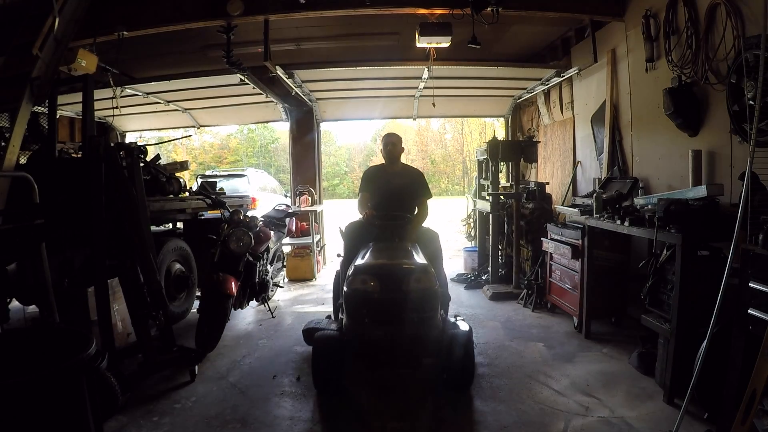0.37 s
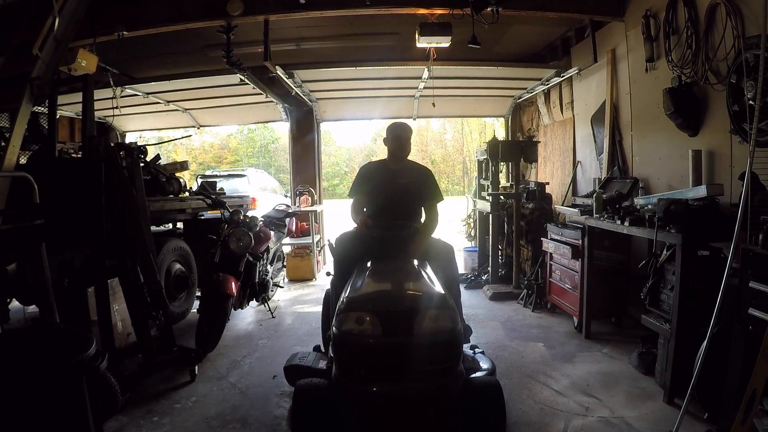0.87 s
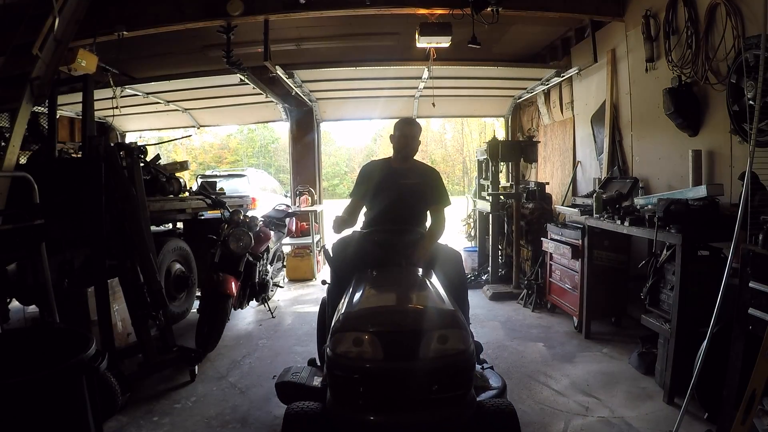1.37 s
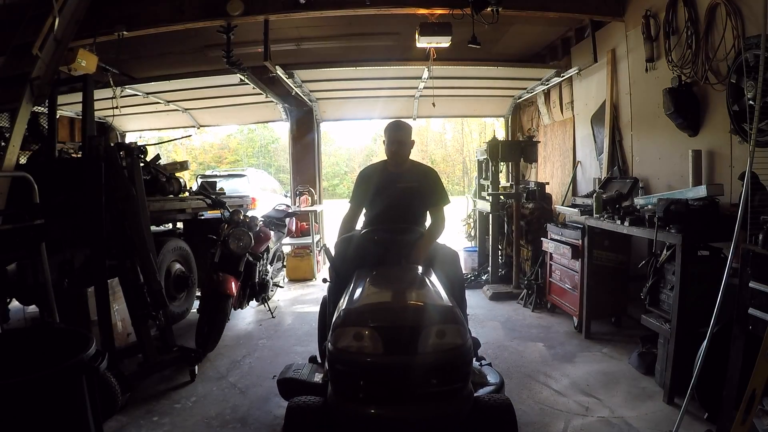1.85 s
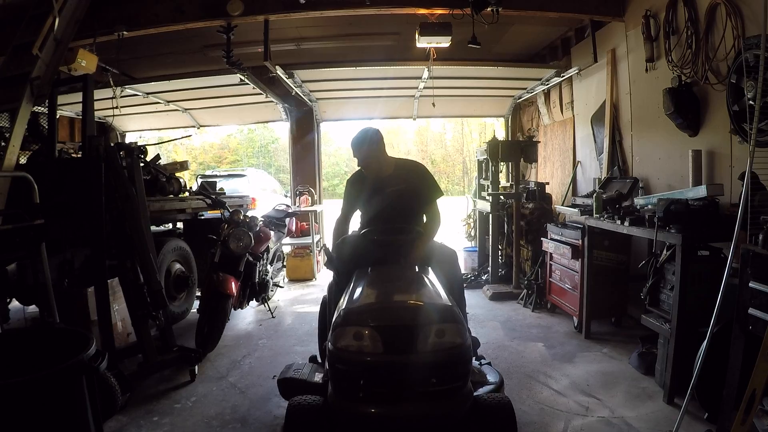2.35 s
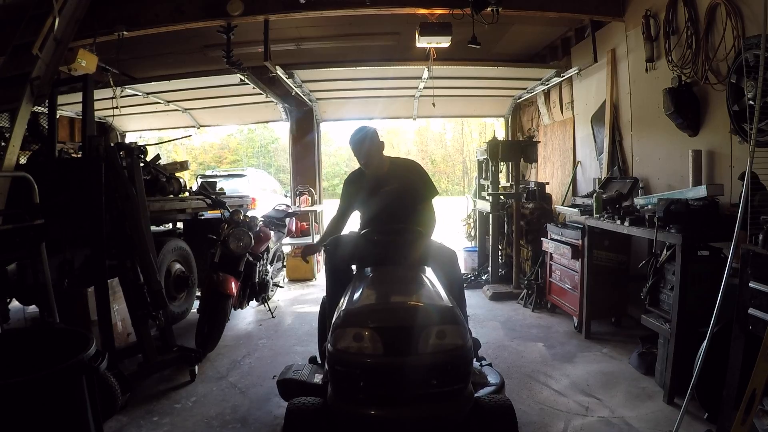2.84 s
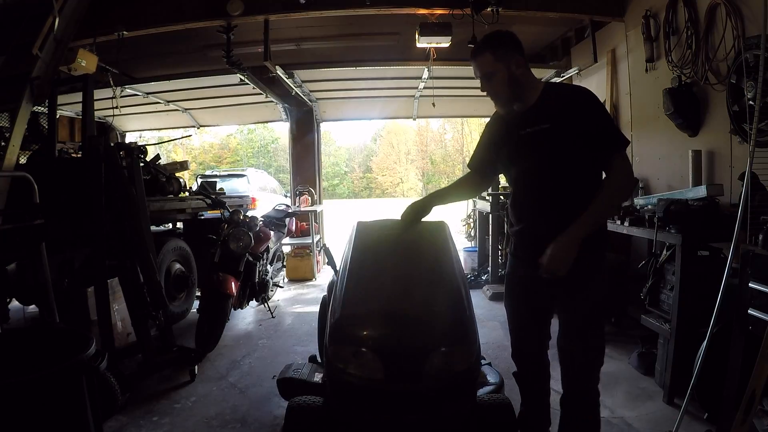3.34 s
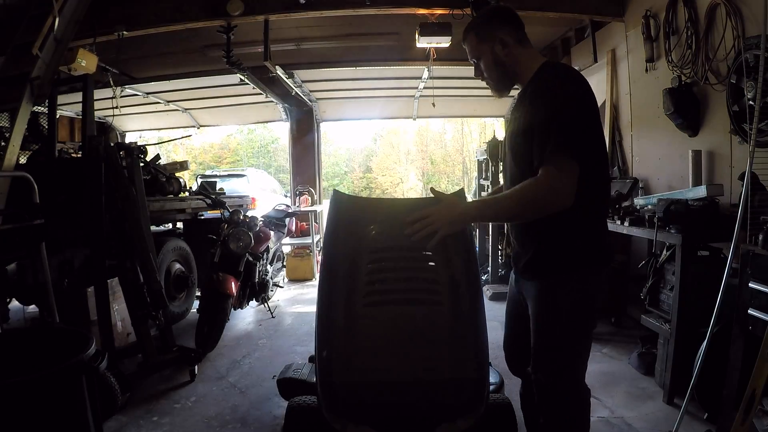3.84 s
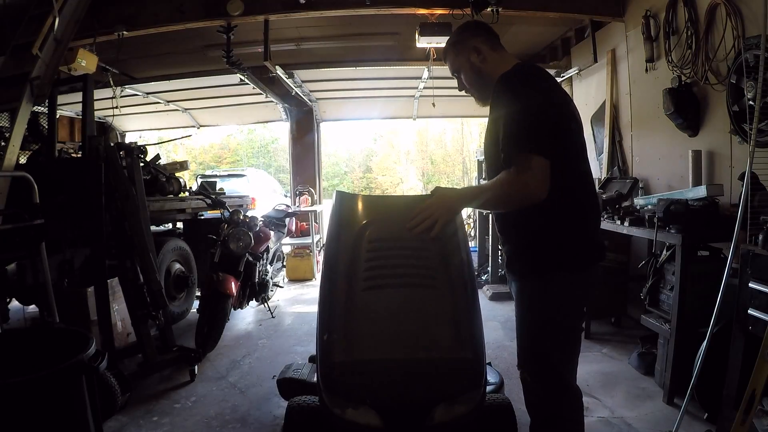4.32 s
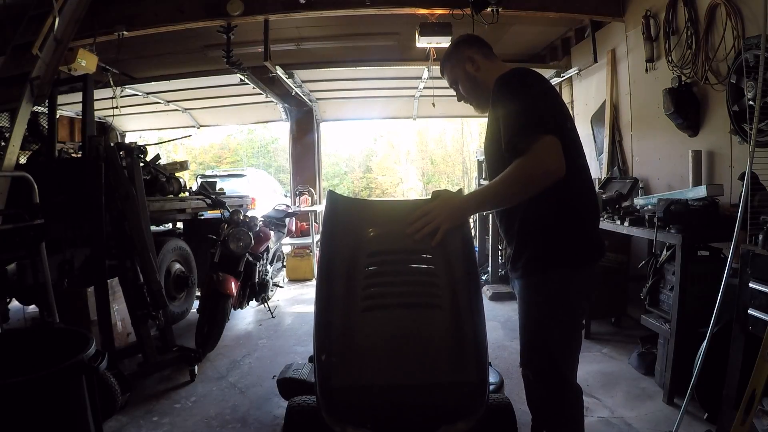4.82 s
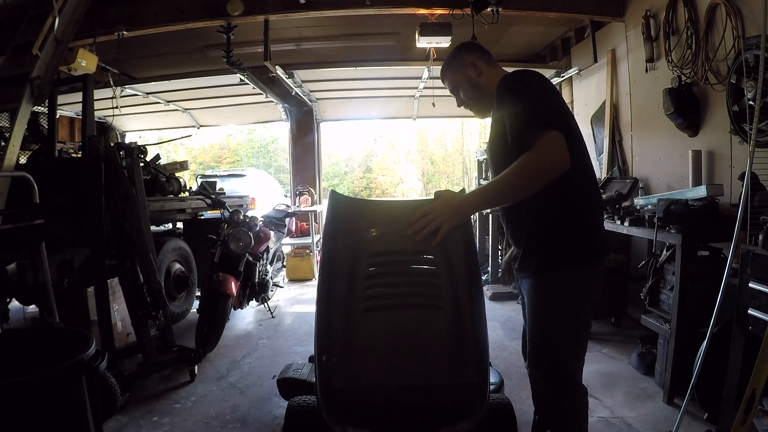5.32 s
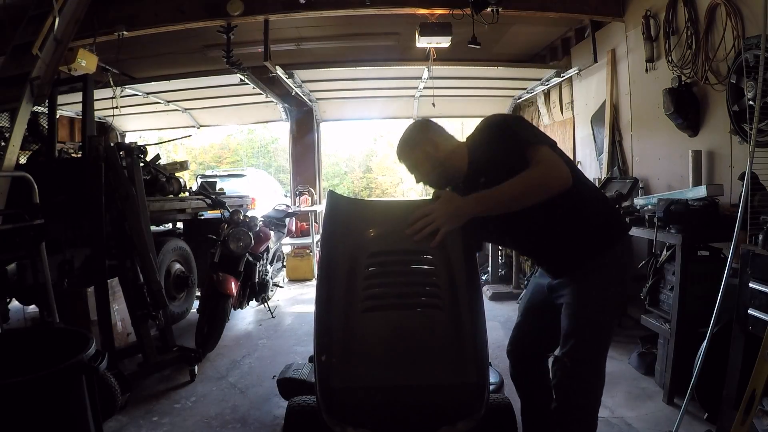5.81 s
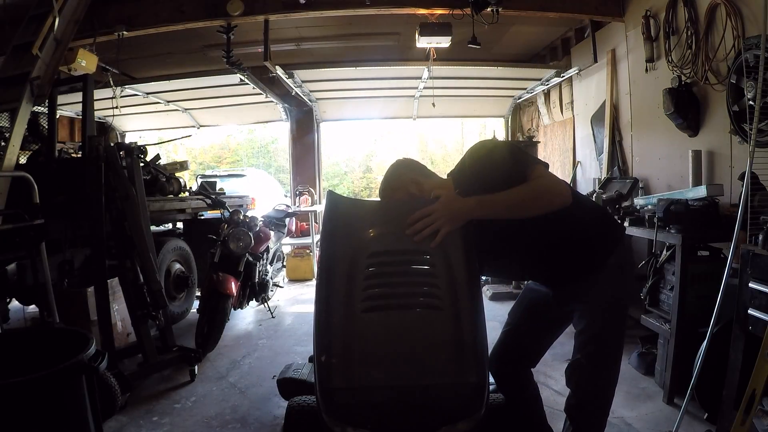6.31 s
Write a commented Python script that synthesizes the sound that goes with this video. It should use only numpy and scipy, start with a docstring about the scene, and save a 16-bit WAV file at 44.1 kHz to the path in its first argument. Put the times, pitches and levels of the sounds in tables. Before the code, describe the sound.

From 0 to about 3 s a small single-cylinder tractor engine dominates. It rolls into a reverberant garage with a brief throttle blip at the start, roughly 25 to 27 firings a second, and halts before the microphone near 0.6 s. Light linkage ticks fall at 0.16 and 0.53 s. The boomy, tinny, clattering throb, with pulsing intake hiss, sags to about 16 firings a second, then breaks off abruptly at 2.99 s. Quiet low rumble and air hiss remain. Shoes scuff and feet shuffle from 3 to 4.5 s. A small hood click and a faint, thin squeak come near 3.3 s, the strongest metal knock at 3.5, another at 3.6, then lower, hollow knocks at 3.93 and 4.02, with deep thumps beneath. Faint taps and scuffs lead to a rounder thud at 4.94 s. Soft cloth rustles follow, a scuff at 5.6, and a firm closing knock at 6.4 s.

```python
"""The throb of a single-cylinder lawn tractor is heard first; it rolls into a garage, stops and idles ever slower.
The engine sound breaks off abruptly; then the sheet-metal hood is lifted with knocks, a hinge squeak and a
rounder thud of something else while shoes and clothes scuff. Periodic firing drives resonant modes of air and
tinware; knocks and scuffs are decaying noise bursts with reverberant tails; the squeak is a gliding sine.
Low rumble and air hiss stay beneath, at one microphone."""
import sys
import numpy as np
from scipy import signal
from scipy.fft import rfft, irfft, next_fast_len
from scipy.io import wavfile
from scipy.ndimage import uniform_filter1d, map_coordinates

SR = 44100
rng = np.random.default_rng(int(sys.argv[2]) if len(sys.argv) > 2 else 0)


def nominal_scale(level):
    """Amplitude ratio for a level in decibels (scalar or array-like)."""
    x = np.asarray(level, float) / 20
    return 10 ** x


def int16_out(signal):
    """Quantize to a 16-bit WAV file."""
    q = np.round(np.clip(np.atleast_2d(signal).T, -1, 1) * 32767)
    wavfile.write(sys.argv[1], SR, q.astype(np.int16))


N = 283563
T = np.arange(N) / SR  # time [s]

# Firing rate, a last blip of throttle, then a long sag towards idle: (time [s], rate [firings/s])
FIRING_RATE = [(0.0, 25.6), (0.12, 27.55), (0.32, 24.15), (0.65, 21.97), (1.05, 20.45), (1.55, 18.6),
               (1.8, 18.0), (2.1, 17.4), (2.98, 16.25)]
# Garage air modes excited by the exhaust, from the doorway and from the parking spot:
# (frequency [Hz], width [Hz], relative level [dB], signed weight [-])
DOORWAY_MODES = [(26, 8.4, -6, 1), (46.2, 15, -2, -1.05), (81.3, 4, 5, 0.92), (120.3, 7.6, 2, 0.81),
                 (138.6, 8.9, -1.5, 0.5), (186, 17, -6, -0.98), (236.7, 4.1, -1, 0.98),
                 (267, 25, -8.5, 0.97), (316, 9.4, -15, 1)]
PARKED_MODES = [(20.2, 7.9, -32, -1), (39, 8.6, -7, 0.97), (82.4, 7.5, -1.5, 1), (110.46, 4.1, 1, -0.95),
                (119.7, 3.3, -9, -0.67), (144.2, 18.5, 7.5, 0.114), (166.5, 11.4, -4, -1.02),
                (197.65, 8, -5.5, -1.1), (222.8, 3, -19, -1.5), (246.4, 10, -28.5, -1.2),
                (270.2, 10.6, -14, -0.9), (285.4, 15, -23, 0.93), (326.2, 6.4, -21.5, 0.65),
                (335, 3.4, -15, 0.97)]
# Resonances of the engine tinware: (frequency [Hz], width [Hz], relative level [dB], signed weight [-])
TINWARE_MODES = [(458, 45, -7, 0.9), (520, 37, -4.5, -0.78), (636, 59, -0.5, 0.85), (651, 33, 3.5, -0.46),
                 (726, 8, -9, 0.7), (836, 14, -1.5, -1.05), (1226, 5.9, 1.5, 1), (1433, 70, -2, -0.56),
                 (2150, 69, 6, 1)]
# Spectra of the tinware clatter and the intake hiss: (frequency [Hz], relative density [dB per Hz])
CLATTER_SPECTRUM = [(230, -4), (385, -9), (450, -3.5), (646, -3), (1070, -5.5), (1230, -6), (1920, -10),
                    (2100, -13), (2420, -13), (4810, -18), (8500, -30.5), (11000, -40.5), (18700, -120)]
HISS_SPECTRUM = [(3820, -6.5), (6500, -2), (7650, -6), (8450, -8), (12200, -4), (14400, -9), (15200, -15)]
# Knocks on the hood and, at 4.944 s, a rounder thud of something else:
# (time [s], peak short-term level [dB], centre [Hz], edge level [dB], rattle t60 [s])
KNOCK_EVENTS = [(3.265, -39, 1350, -18.5, 0.054), (3.276, -38, 1410, -27, 0.12),
                (3.43, -53.5, 910, -6, 0.3), (3.504, -24.5, 1210, -5.5, 0.2),
                (3.588, -31.5, 1150, -11, 0.47), (3.934, -29.5, 520, -16, 0.41),
                (4.017, -34.5, 500, -7.5, 0.27), (4.24, -50, 695, -23, 0.54), (4.68, -49.5, 620, -29, 0.45),
                (4.897, -52, 510, -30, 0.12), (4.944, -38, 950, -26.5, 0.27), (6.395, -40.5, 875, -6, 0.68),
                (6.4176, -26, 1120, -9, 0.28)]
# Resonances of the hood panel: (frequency [Hz], width [Hz], relative level [dB], signed weight [-])
HOOD_MODES = [(164.3, 5.6, 2, -1.33), (220, 4.2, -1, 1), (249.7, 6.9, 5, -1.13), (280, 35, -1, 0.61),
              (427.3, 4.6, 0.5, -1.18), (468.5, 32, -6, 0.67), (566.4, 10, 1.5, -1.12), (636, 13, -6, 0.87),
              (721, 21, 0, -1.1), (864, 70, 1, 0.17), (1031, 31, -2, -0.94), (1150, 58, -11, 0.44),
              (1256, 60, -2, -1.05), (1525, 46, -5.5, 0.47), (2203, 46, -0.5, -1.08), (2580, 51, -6, 0.42),
              (3030, 63, -2, -0.88), (3550, 37, -4, 0.48), (4280, 56, -4, -1.25)]
# Shoes and hands catching on floor and metal:
# (time [s], peak short-term level [dB], centre [Hz], treble setting [dB], t60 [s])
SCUFF_EVENTS = [(3.05, -47.5, 3680, -18.5, 0.48), (3.7873, -48, 4340, -8.5, 1),
                (3.905, -45.5, 4370, -13, 0.43), (4.0161, -36.5, 3420, -7, 0.26),
                (4.655, -51, 2470, -27, 0.4), (4.7152, -50.5, 5600, -8, 0.23),
                (5.602, -48.5, 3030, -14, 0.31), (6.3336, -42.5, 4140, -11, 0.34)]
# Pedal linkage ticks: (time [s], peak short-term level [dB])
LINKAGE_TICKS = [(.159, -37), (.532, -35)]
# Cloth and engine hiss swelling briefly:
# (time [s], length [s], peak short-term level [dB], treble level [dB])
RUSTLE_EVENTS = [(2.452, 0.095, -39.5, -13), (4.201, 0.13, -58, -4), (4.386, 0.12, -65, -1),
                 (5.302, 0.29, -59.5, -8), (5.748, 0.094, -56, -11), (6.229, 0.14, -59, -15)]
# Spectrum of the rustles below their treble: (frequency [Hz], relative level [dB])
CLOTH_SPECTRUM = [(300, -12), (1500, 3.5), (3000, 4), (4300, 2), (5600, 0.5), (7300, -6.5), (8200, -11)]
# Deep thumps, the chassis rocking as the hood swings and lands: (time [s], level before rise and decay [dB])
CHASSIS_THUMPS = [(3.27, -52), (3.51, -37), (3.935, -37.5), (4.7, -59)]
# Spectra of low rumble, shuffling feet and air hiss: (frequency [Hz], relative density [dB per Hz])
RUMBLE_SPECTRUM = [(12, -39), (20, -4), (37, -1.5), (49, -9), (81, -8), (92, -17.5), (113, -4), (123, -26),
                   (135, -26), (260, -42), (340, -69), (570, -120)]
SHUFFLE_SPECTRUM = [(90, -17), (140, -2.5), (200, 0.5), (330, -8.5), (500, -5), (900, -37)]
AIR_SPECTRUM = [(120, -40), (200, -9.5), (420, -14), (452, -6), (495, -23), (562, -5), (661, -11),
                (2670, -16), (3630, -15), (15200, -32)]
# Reverberation of the garage: (frequency [Hz], t60 [s])
GARAGE_T60 = [(100, 0.75), (500, 0.53), (2000, 0.35), (6000, 0.47), (14000, 0.23)]

ARRIVE = (0.546, 0.61)  # the tractor halts in front of the microphone [s]
CUT = (2.984, 2.997)  # the engine sound breaks off abruptly [s]
IDLE = 17  # firings per s at which the clatter and hiss levels hold
EXHAUST_DB = -28.5
CLATTER_DB, CLATTER_GROWS = -35, 0.41  # at idle [dB]; [dB] per extra firing a second
HISS_DB, HISS_GROWS = -52, 0.079  # at idle once parked [dB]; [dB] per extra firing a second
ROLLING_HISS_DB = 3.5  # more hiss while the tractor rolls
BOOM_FALLS_DB = 4.5  # boom lost per octave of knock centre above 500 Hz
PROPPED_S, PROPPED_BOOM_DB = 4.92, -19.5  # once the hood stands propped, knocks and thud boom less
LINKAGE_COLOUR = (3400, -15.5, 0.16)  # centre [Hz], treble setting [dB], t60 [s]
SCUFF_LOW_DB, TICK_LOW_DB = -6, -13  # settings for the low end under the centre
BURST_S = 0.8  # length of every burst
SQUEAK_S, SQUEAK_HZ, SQUEAK_RISE_HZ = (3.28, 3.39), 2300, 19.3
SQUEAK_DB, SQUEAK_FADE_DB = -49, -6.5  # rms at the start; change by the end
THUMP_RISE_S, THUMP_T60_S = 0.025, 0.82
RUMBLE_DB, AIR_DB = -56.5, -62  # low rumble from outdoors; air hiss
SHUFFLE_DB, STILL_DB = -55, -68.5  # feet shuffling while the hood is lifted; before and after
SHUFFLE_STARTS, SHUFFLE_ENDS = (3, 3.05), (4.04, 4.6)  # [s]


def unit(x):
    """Normalization: the signal scaled to rms 1."""
    return x / np.sqrt(np.mean(x ** 2) + 1e-20)


def along(points, hz):
    """Logarithmic frequency scale: (Hz, value) points interpolated on a log axis."""
    f, v = np.transpose(points)
    return np.interp(np.log(hz + 1), np.log(f + 1), v)


def ramp(span):
    """Linear transition: 0 before the span, 1 after it."""
    return np.interp(T, span, [0, 1])


def wobble(rate):
    """Band-limited fluctuation: a smooth random curve with rate knots a second."""
    knots = rng.standard_normal(int(N * rate / SR) + 4)
    return map_coordinates(knots, [T * rate])


def filtered(x, response):
    """Linear filtering: the spectrum of x times a complex response of frequency."""
    m = next_fast_len(len(x) + SR // 2)
    return irfft(rfft(x, m) * response(np.fft.rfftfreq(m, 1 / SR)), m)[:len(x)]


def modes(table):
    """Modal superposition: damped resonances add; neighbours of like polarity cancel in between."""
    def response(f):
        return sum(weight * nominal_scale(db) * 1j * f * width / (centre * centre - f * f + 1j * f * width)
                   for centre, width, db, weight in table)
    return response


def noise(spectrum):
    """Spectral shaping: white noise coloured and scaled to rms 1."""
    return unit(filtered(rng.standard_normal(N), lambda hz: nominal_scale(along(spectrum, hz))))


def garage(x, wet_db):
    """Reverberation: a fresh diffuse noise tail in which each frequency dies at its own speed."""
    hz, t, z = signal.stft(rng.standard_normal(SR // 2), SR, nperseg=256)
    decay = nominal_scale(-60 * t / np.abs(along(GARAGE_T60, hz))[:, None])
    tail = signal.istft(z * decay, SR, nperseg=256)[1]
    tail = tail / np.linalg.norm(tail)
    delayed = np.pad(x, (200, 0))  # the tail begins 200 samples late
    return x + nominal_scale(wet_db) * signal.fftconvolve(delayed, tail)[:len(x)]


def burst(out, s, db, colour, envelope, wet_db):
    """Transient excitation: enveloped noise is coloured, reverberates and is added at time s."""
    dry = filtered(envelope * rng.standard_normal(len(envelope)), colour)
    wet = garage(dry, wet_db)
    peak_rms = np.sqrt(uniform_filter1d(wet ** 2, size=2000).max())  # loudest 2000-sample stretch
    piece = nominal_scale(db) * wet / peak_rms
    return out + np.pad(piece, (round(s * SR), N))[:N]


def engine():
    """Periodic excitation: firings ring garage modes and clattering tinware; the intake gasps once a cycle."""
    speed = np.interp(T, *np.transpose(FIRING_RATE))
    parked = ramp(ARRIVE)
    cycle = np.cumsum(speed) / SR + 0.0027 * wobble(12)  # firings so far, slightly unsteady

    turbulence = 0.8 * rng.standard_normal(N)
    puffs = orders(cycle, first=1, count=22, smear=0.022) * nominal_scale(0.3 * wobble(18)) + turbulence
    doorway_exhaust = unit(filtered(puffs, modes(DOORWAY_MODES)))
    parked_exhaust = unit(filtered(puffs, modes(PARKED_MODES)))
    exhaust = (1 - parked) * doorway_exhaust + parked * parked_exhaust

    ringing = orders(cycle, first=20, count=56, smear=0.013) * nominal_scale(1.4 * wobble(8.95))
    buzz = unit(filtered(ringing, modes(TINWARE_MODES)))
    # four strokes a cycle: a gliding whine
    strokes = filtered(orders(4 * cycle, first=6, count=5, smear=0.13), modes([(640, 91, 0, 1)]))
    whine = unit(strokes) * nominal_scale(2.1 * wobble(5.45))
    tins = unit(filtered(noise(CLATTER_SPECTRUM), lambda hz: 1 + 0.57 * np.abs(modes(TINWARE_MODES)(hz))))
    pulsing_tins = tins * nominal_scale(0.66 * np.cos(2 * np.pi * (cycle - 0.25)))
    clatter = unit(pulsing_tins + nominal_scale(-11.5) * buzz + nominal_scale(-8) * whine)
    clatter_db = CLATTER_DB + CLATTER_GROWS * (speed - IDLE)

    depth_db = np.interp(speed, [17, 26], [3.4, 1.2])  # the slower, the deeper the gaps between gasps
    gasp_db = depth_db * np.tanh(1.5 * np.cos(2 * np.pi * (cycle - 0.7)))
    hiss = unit(nominal_scale(gasp_db + 0.8 * wobble(12)) * noise(HISS_SPECTRUM))
    hiss_db = HISS_DB + HISS_GROWS * (speed - IDLE) + ROLLING_HISS_DB * (1 - parked)

    sound = nominal_scale(EXHAUST_DB) * exhaust + nominal_scale(clatter_db) * clatter + nominal_scale(hiss_db) * hiss
    return sound * (1 - ramp(CUT))


def orders(cycle, first, count, smear):
    """Harmonic dispersion: the muffler smears each puff over the cycle, higher firing orders coming later."""
    order = np.arange(count)[:, None] + first
    return unit(np.cos(2 * np.pi * (order * cycle - smear * order ** 2)).sum(axis=0))


def knocks():
    """Impact excitation: each knock or thud cracks, rattles unevenly and rings most the modes near its centre."""
    out, t = np.zeros(N), T[:int(BURST_S * SR)]
    panel = modes(HOOD_MODES)  # the thud is coloured by the same modes
    for s, db, centre_hz, edge_db, t60 in KNOCK_EVENTS:
        boom_db = -BOOM_FALLS_DB * np.log2(centre_hz / 500) + PROPPED_BOOM_DB * (s > PROPPED_S)
        tilt = [(60, boom_db - 6.5), (250, boom_db), (0.57 * centre_hz, -2.5), (centre_hz, 0),
                (1.51 * centre_hz, 0.38 * edge_db), (3200, edge_db), (9000, edge_db - 25),
                (15000, edge_db - 36)]
        rattle = nominal_scale(-60 * t / t60 + 6.0 * wobble(94)[:len(t)])
        crack = 0.81 * nominal_scale(-60 * t / 0.017)
        out = burst(out, s, db, lambda hz: nominal_scale(along(tilt, hz)) * (0.39 + panel(hz)),
                    rattle + crack, wet_db=-1.0)
    return out


def scuffs():
    """Frictional excitation: a sudden catch, brightest around its centre, dies away; linkage ticks likewise."""
    out, t = np.zeros(N), T[:int(BURST_S * SR)]
    grit = modes([(5600, 1200, 2.7, 0.48)])  # fine grit under the sole hisses high
    ticks = [(*row, *LINKAGE_COLOUR, TICK_LOW_DB) for row in LINKAGE_TICKS]
    catches = ticks + [(*row, SCUFF_LOW_DB) for row in SCUFF_EVENTS]
    for s, db, centre_hz, top_db, t60, low_db in catches:
        tilt = [(120, low_db - 6.5), (700, low_db + 3), (0.61 * centre_hz, -5), (centre_hz, 0),
                (1.17 * centre_hz, -4), (8500, top_db - 5.5), (12000, top_db - 3.0), (15000, top_db - 12)]
        onset = 1 - np.exp(-t / 0.00087)
        slide = onset * nominal_scale(-60 * t / t60 + 1.4 * wobble(122)[:len(t)])
        out = burst(out, s, db, lambda hz: nominal_scale(along(tilt, hz)) * (1 + grit(hz)), slide, wet_db=-7.0)
    return out


def rustles():
    """Amplitude modulation: soft, grainy hiss swells and fades over half a sine."""
    out, t = np.zeros(N), T[:int(BURST_S * SR)]
    for s, length, db, top_db in RUSTLE_EVENTS:
        tilt = CLOTH_SPECTRUM + [(12000, top_db), (15000, top_db - 6)]
        grain = nominal_scale(3.3 * wobble(50)[:len(t)])
        swell = np.sin(np.pi * np.clip(t / length, 0, 1)) * grain
        out = burst(out, s, db, lambda hz: nominal_scale(along(tilt, hz)), swell, wet_db=-1.5)
    return out


def hinge():
    """Frequency modulation: the hinge's thin squeak is a sine that rises a little as it fades."""
    way, (start, end) = ramp(SQUEAK_S), SQUEAK_S
    on = ramp((start, start + 0.01)) * (1 - ramp((end - 0.015, end)))
    phase = 2 * np.pi * np.cumsum(SQUEAK_HZ + SQUEAK_RISE_HZ * way) / SR
    level = nominal_scale(SQUEAK_DB + SQUEAK_FADE_DB * way + 1.4 * wobble(60))
    return np.sqrt(2) * on * level * np.sin(phase)


def background():
    """Incoherent addition: independent noises for rumble with chassis thumps, shuffling and steady air hiss."""
    thumps = np.zeros(N)
    for s, db in CHASSIS_THUMPS:
        t = np.clip(T - s, 0, None)
        thumps += nominal_scale(db - 60 * t / THUMP_T60_S) * (1 - np.exp(-t / THUMP_RISE_S))
    low = (nominal_scale(RUMBLE_DB + 1.9 * wobble(3.92)) + thumps) * noise(RUMBLE_SPECTRUM)
    shuffling = ramp(SHUFFLE_STARTS) * (1 - ramp(SHUFFLE_ENDS))
    shuffle_db = STILL_DB + (SHUFFLE_DB - STILL_DB) * shuffling
    return low + nominal_scale(shuffle_db) * noise(SHUFFLE_SPECTRUM) + nominal_scale(AIR_DB) * noise(AIR_SPECTRUM)


def scene():
    """Linear superposition: all sources add at the one microphone."""
    return (engine() + knocks() + scuffs() + rustles() + hinge() + background())[None]


def band_limit(x):
    """A steep low-pass at the top of the band."""
    return signal.sosfilt(signal.butter(12, 15330, fs=SR, output="sos"), x)


def record(dry):
    """Signal chain: the finished mix passes to the last stage at unchanged gain."""
    return band_limit(dry)


dry = scene()
out = record(dry)
int16_out(out)
```